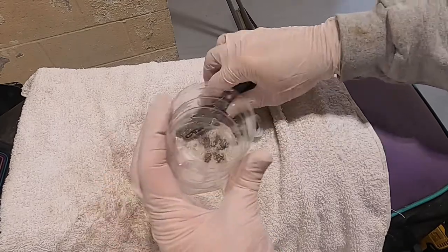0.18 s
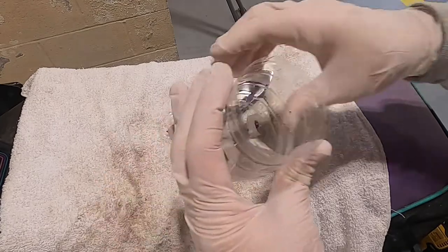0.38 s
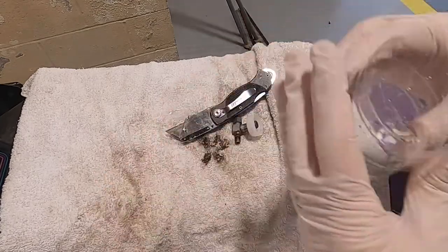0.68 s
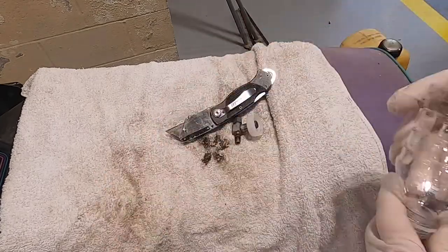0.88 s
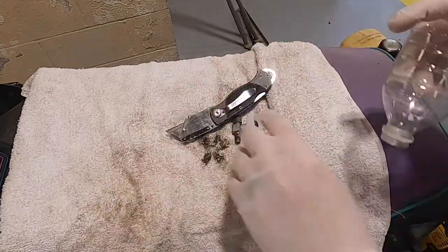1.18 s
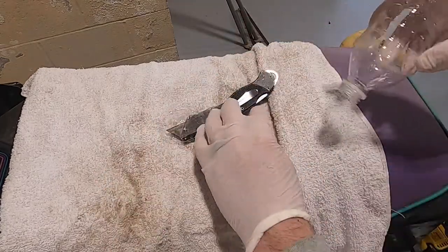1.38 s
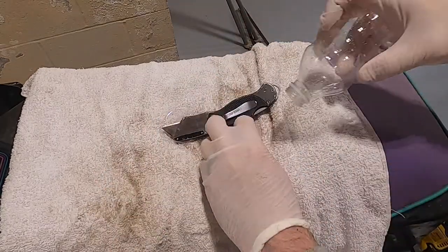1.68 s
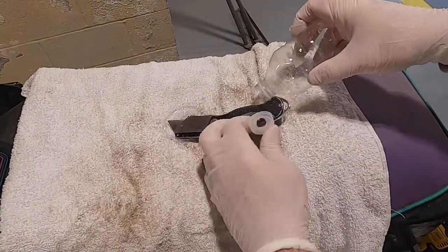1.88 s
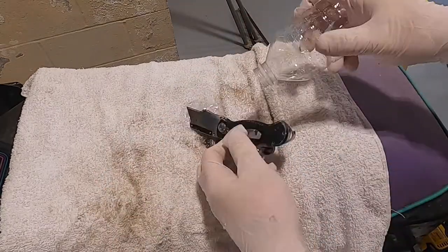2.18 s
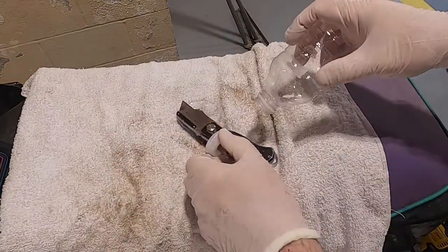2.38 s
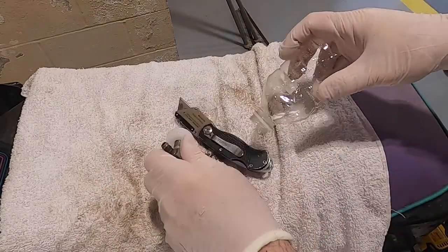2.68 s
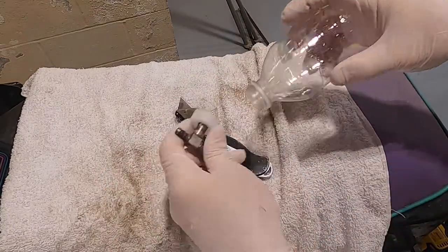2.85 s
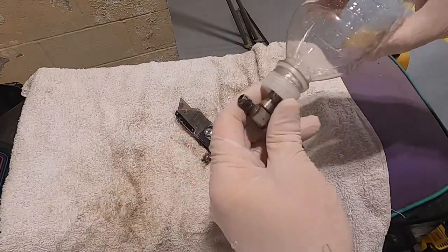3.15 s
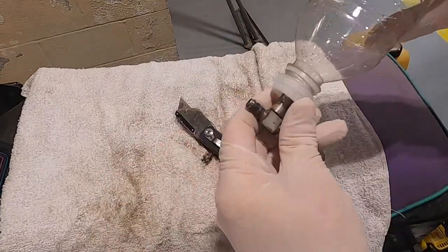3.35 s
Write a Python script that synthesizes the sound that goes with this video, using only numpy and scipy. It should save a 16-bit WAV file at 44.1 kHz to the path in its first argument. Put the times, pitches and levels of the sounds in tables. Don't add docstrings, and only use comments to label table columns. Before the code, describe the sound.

A thin plastic bottle crackles, snaps and rattles in gloved hands, close up in a quiet workshop.

```python
import sys
import numpy as np
from scipy import signal
from scipy.fft import rfft, irfft, next_fast_len
from scipy.io import wavfile
from scipy.ndimage import uniform_filter1d, map_coordinates

SR = 44100
rng = np.random.default_rng(int(sys.argv[2]) if len(sys.argv) > 2 else 0)


def pcm_store(signal):
    levels = np.round(np.clip(np.atleast_2d(signal), -1, 1) * 32767)
    wavfile.write(sys.argv[1], SR, levels.astype(np.int16).T)


def gain_from_db(level_db):
    decades = np.asarray(level_db, float) / 20
    return 10 ** decades


N = 154350


def unit(x):
    return x / np.sqrt(np.mean(x ** 2) + 1e-20)


def along(points, hz):
    f, value = np.transpose(points)
    return np.interp(np.log(hz + 1), np.log(f + 1), value)


def curve(rows):
    s, value = np.transpose(rows)
    return np.interp(np.arange(N) / SR, s, value)


def wobble(rate):
    knots = rng.standard_normal(int(N * rate / SR) + 4)
    return map_coordinates(knots, [np.arange(N) * rate / SR])


def filtered(x, response):
    size = next_fast_len(N + 8192)
    return irfft(rfft(x, size) * response(np.fft.rfftfreq(size, 1 / SR)), size)[..., :N]


def noise(spectrum, lo_hz=0):
    x = filtered(rng.standard_normal(N), lambda hz: gain_from_db(along(spectrum, hz)))
    return x / np.std(filtered(x, lambda hz: hz >= lo_hz))


def bump(f, hz, width_hz):
    return 1 / (1 + ((f - hz) / width_hz) ** 2)


def add(out, s, wave):
    at = np.clip(np.round(s * SR).astype(int), 0, N)[:, None] + np.arange(wave.shape[1])
    out += np.bincount(at.ravel(), wave.ravel(), N + wave.shape[1] + 1)[:N]


def bursts(s, db, t60, size=1200, rise=0.0007):
    t, out = np.arange(size) / SR, np.zeros(N)
    envelope = gain_from_db(db[:, None] - 60 * t / t60) * (1 - np.exp(-t / rise)) ** 2
    add(out, s, envelope * rng.standard_normal((len(s), size)))
    return out


def rings(s, db, hz, t60, size, rise=0.00016):
    t, out = np.arange(size) / SR, np.zeros(N)
    envelope = gain_from_db(db[:, None] - 60 * t / np.reshape(t60, (-1, 1))) * (1 - np.exp(-t / rise))
    add(out, s, envelope * np.sin(2 * np.pi * hz[:, None] * t))
    return out


def patchy(x):
    z = signal.stft(x, nperseg=256)[2]
    field = uniform_filter1d(rng.standard_normal(z.shape), size=4, axis=0)
    field = uniform_filter1d(field, size=7, axis=1)
    return signal.istft(z * gain_from_db(2.8 * unit(field)), nperseg=256)[1][:N]


# (f/Hz, width/Hz, level/dB)
WALL_RIDGES = [(2300, 200, 3), (2870, 83, 5.5), (4300, 210, 1.5), (5920, 237, 8)]


def wall(spectrum):
    def response(f):
        ridges = sum(db * bump(f, hz, width) for hz, width, db in WALL_RIDGES)
        return gain_from_db(along(spectrum, f) + ridges)
    return response


# (t/s, level/dB)
HUM_SWELLS = [(0, -64), (.09, -40), (.2, -49.5), (.3, -35.5), (.37, -69), (.45, -42), (.7, -49),
              (1.4, -54.5), (1.65, -37), (1.74, -56), (1.84, -36.5), (2.07, -51.5), (2.2, -36),
              (2.4, -42.5), (2.8, -36.5), (2.95, -45.5), (3.2, -40), (3.5, -60)]
# (t/s, f/Hz)
HIGH_TONE = [(.35, 66.76), (.55, 73.23)]
# (t/s, f/Hz)
LOW_TONE = [(1.95, 46.4), (2.15, 50.62)]
# (t/s, share of the lower tone)
TONE_SHIFT = [(1.2, 0.14), (1.5, 0.72)]
# (f/Hz, level per Hz/dB)
AIR_COLOUR = [(15, -16.5), (25, 0.5), (73, -10), (169, -18), (378, -36.5), (495, -44.5), (722, -53),
              (10100, -65.5), (15500, -80.5)]


def hum():
    def tone(hz, drift_hz):
        return np.sqrt(2) * np.sin(2 * np.pi * np.cumsum(hz + drift_hz * wobble(4.7)) / SR)

    def duct(f):
        return f ** 2 / (f ** 2 + 60 ** 2) * (1 + 4.5 * bump(f, 980, 150))

    share = np.clip(curve(TONE_SHIFT), 0, 1)
    lower = share * tone(curve(LOW_TONE), 1.4)
    higher = (1 - 1.14 * share) * tone(curve(HIGH_TONE), 1.1)
    fan_hz, fan_db, air_db = 147, -64, -53.5
    fan = gain_from_db(fan_db + 5.6 * wobble(12)) * tone(fan_hz, 3.606)
    air = gain_from_db(air_db + 0.4 * wobble(5.8)) * filtered(noise(AIR_COLOUR, 90), duct)
    return gain_from_db(curve(HUM_SWELLS)) * (lower + higher) + fan + air


# (t/s, level/dB)
HANDLING_LEVEL = [(0, -58), (.2, -62.5), (.37, -53.5), (.57, -61.5), (.75, -61.5), (1.0, -57),
                  (1.37, -61.5), (1.74, -52.5), (2.37, -56.5), (2.6, -59.5), (2.75, -61.5), (3.0, -71.5),
                  (3.42, -71)]
# (f/Hz, level per Hz/dB)
CRACKLE_COLOUR = [(240, -47), (400, -6.5), (600, -12), (950, -1), (2430, -5), (4420, -8.5), (6480, -17),
                  (15500, -39)]


def crackle():
    ticks_per_s, spread_db, clump_db = 250, 8.5, 3.5
    u = rng.random((int(ticks_per_s * N / SR), 2)).T
    ticks = bursts(u[0] * N / SR, -spread_db * np.log(u[1] + 0.06), 0.0045, size=200)
    ticks = unit(filtered(ticks * gain_from_db(clump_db * wobble(17.0)), wall(CRACKLE_COLOUR)))
    hiss = noise(CRACKLE_COLOUR) * gain_from_db(-1.5 + 1.33 * wobble(24.42))
    level_db = curve(HANDLING_LEVEL)
    tick_db = -3 + 0.8 * np.minimum(level_db + 54, 0)
    return gain_from_db(level_db) * (patchy(ticks) * gain_from_db(tick_db) + hiss)


# (start t/s, end t/s, level/dB, low ridge f/Hz, swell/dB)
GLOVE_STROKES = [
    (-0.007, 0.156, -68, 1400, 25),
    (0.776, 0.836, -41.5, 2040, 36),
    (0.868, 0.927, -49.5, 1570, -5.5),
    (0.887, 1.016, -44.5, 1720, 17.5),
    (1.043, 1.202, -67, 1550, -21),
    (1.075, 1.14, -38, 1066, 23),
    (1.278, 1.363, -58.5, 5900, -7.5),
    (2.825, 2.885, -60.5, 8900, 6.5),
    (2.9, 3.018, -69, 6900, 0.5),
    (3.448, 3.526, -48.5, 987, 16.5),
]
# (f/Hz, level per Hz/dB)
RUB_COLOUR = [(450, -17.5), (900, 6.5), (2500, 0.5), (4000, 0), (5500, -7.5), (9500, -14), (14500, -42)]


def strokes():
    t, out = np.arange(N) / SR, np.zeros(N)
    for start, end, db, ridge_hz, swell_db in GLOVE_STROKES:
        def tone(f):
            ridges = 1 + 2.4 * bump(f, ridge_hz, 0.097 * ridge_hz) + 0.27 * bump(f, 3900, 350)
            return gain_from_db(along(RUB_COLOUR, f)) * ridges

        rub = unit(filtered(rng.standard_normal(N) * gain_from_db(2.74 * wobble(160)), tone))
        edge = np.clip((t - start) / 0.012, 0, 1) * np.clip((end - t) / 0.011, 0, 1)
        remaining = np.clip((end - t) / (end - start), 0, 1)
        out += rub * edge * gain_from_db(db - swell_db * remaining ** 2)
    return out


# (start t/s, end t/s, level/dB, first f/Hz, last f/Hz)
PANEL_QUIVERS = [(.185, 0.232, -55.5, 2750, 2900), (.268, 0.308, -38, 2850, 2760),
                 (.325, 0.407, -49.5, 2700, 2800), (.45, 0.916, -67.5, 1000, 1020),
                 (.79, 0.833, -51.5, 3400, 2780), (.88, 0.906, -55.5, 3800, 3530),
                 (.915, 1.022, -50.5, 3770, 3950), (1.03, 1.118, -58, 4300, 4060),
                 (1.1, 1.135, -43, 950, 1180), (1.57, 1.635, -59.5, 4300, 4300),
                 (1.78, 1.888, -67, 6000, 5860), (1.8, 1.883, -62, 2700, 2800),
                 (1.895, 1.968, -45, 890, 911), (1.9, 1.962, -53, 2100, 1510),
                 (1.97, 2.09, -58, 1300, 1866), (2.2, 2.255, -49, 2300, 2136),
                 (2.215, 2.248, -47, 6300, 6280), (2.22, 2.248, -49.5, 4500, 4400),
                 (2.27, 2.306, -51.5, 6200, 5910), (2.35, 2.417, -54, 2900, 2860),
                 (3.45, 3.514, -48, 721, 1055)]


def quivers():
    out = np.zeros(N)
    for start, end, db, first_hz, last_hz in PANEL_QUIVERS:
        at = np.arange(round(start * SR), min(round(end * SR), N))
        t = at / SR - start
        u = t / (end - start)
        knots = rng.standard_normal((3, 600))
        band_rate = 11 * np.sqrt(first_hz)
        re, im = (map_coordinates(k, [t * band_rate]) for k in knots[:2])
        rough = gain_from_db(5.5 * map_coordinates(knots[2], [t * 150]))
        phase = 2 * np.pi * np.cumsum(first_hz + (last_hz - first_hz) * u) / SR
        swell = np.abs(np.sin(np.pi * u)) ** 0.6
        out[at] += gain_from_db(db) * swell * rough * (re * np.cos(phase) + im * np.sin(phase))
    return out


# (f/Hz, level per Hz/dB)
CRACK_COLOUR = [(500, -39.5), (1100, -5), (2200, 0), (3000, 0), (4400, 0), (6200, -14.5), (7500, -18.5),
                (15000, -37.5)]


def snaps(table, treble_db, long):
    s, db, hz = np.transpose(table)
    u = rng.random((len(s), 8)).T
    crack_s, after_s, ring_s = 0.013, 0.011, 0.0084
    crack = bursts(s - 0.0005, 0.92 * db - 5, crack_s * long)
    crack += bursts(s, 1.37 * db + 9.5, 0.0026, rise=0.00013)
    for k in range(3):
        after_db = 0.88 * db - 1.5 - 8 * u[3 + k]
        crack += bursts(s + after_s * long * (u[k] - 0.3), after_db, crack_s)

    def tone(f):
        return wall(CRACK_COLOUR)(f) * gain_from_db(treble_db * np.clip(f / 6000, 0, 1))

    return patchy(filtered(crack, tone)) + rings(s, db, hz, ring_s * (0.81 + 0.36 * u[6]), size=900)


# (t/s, peak level/dB, ring f/Hz)
GRIP_SNAPS = [(0.2241, -4.5, 2890), (0.2344, -24.5, 2880), (0.2613, -11.5, 3770), (0.2836, -15.5, 2900),
              (0.2989, -20.5, 2430), (0.3606, -24.5, 3050), (0.3839, -32, 2870), (0.4186, -28.5, 2520),
              (0.4375, -27.5, 1880), (0.4544, -31.5, 1780), (0.5139, -24, 2560), (0.5356, -33.5, 1710)]
# (t/s, peak level/dB, ring f/Hz)
BUCKLE_SLIPS = [(.2283, -33.5, 3020), (.2648, -13, 3340), (.2705, -17, 2530), (1.7585, -32.5, 2820),
                (1.9, -27, 1340), (1.961, -25.5, 2600), (1.978, -25, 2620), (2.238, -36.5, 2180),
                (2.298, -42.5, 5960), (2.3293, -24.5, 3500), (2.341, -23, 2300), (2.355, -31, 3040)]
# (t/s, peak level/dB, ring f/Hz)
SMALL_CREASES = [(.3125, -32, 2430), (.3352, -37, 2900), (.374, -48, 2880), (.411, -46, 3470),
                 (.6215, -47.5, 2260), (1.5807, -40, 4400), (1.5852, -36, 4230), (1.614, -29.5, 1900),
                 (1.694, -41, 1790), (1.704, -41, 2750), (1.74, -53, 2600), (1.794, -57, 3000),
                 (1.836, -38, 3020), (1.842, -38.5, 4100), (1.872, -36.5, 4590), (1.884, -34.5, 4270),
                 (1.91, -27.5, 3310), (1.966, -33.5, 4370), (2.183, -33, 6200), (2.256, -37.5, 3900),
                 (2.291, -38, 3970), (2.371, -38.5, 2920), (2.434, -32.5, 2500), (2.605, -33.5, 2470),
                 (2.615, -36.5, 2940), (2.642, -30.5, 3020), (2.8, -46, 2580), (2.967, -50, 2980),
                 (3.287, -53.5, 6400), (3.302, -52, 6080), (3.313, -52.5, 5200)]
# (t/s, peak level/dB, ring f/Hz)
TURN_SNAPS = [(1.3931, -34, 1750), (1.4078, -35, 4300), (1.4638, -31.5, 1660), (1.5264, -21, 2580),
              (1.5987, -28.5, 1170), (1.6218, -31.5, 1780), (1.7182, -25, 1640), (1.7543, -17, 2780),
              (1.7875, -27.5, 2670), (1.8272, -32.5, 1740), (1.8956, -6, 1586), (1.9248, -18.5, 1980),
              (1.972, -20.5, 2400), (2.0056, -27.5, 2440), (2.018, -22.5, 2350)]
# (t/s, peak level/dB, ring f/Hz)
RATTLE_SNAPS = [
    (2.0951, -29, 2420),
    (2.1415, -30, 3810),
    (2.175, -28, 2300),
    (2.2039, -25.5, 2470),
    (2.2236, -25, 2240),
    (2.274, -37.5, 4140),
    (2.2844, -39.5, 5940),
]
# (t/s, peak level/dB, ring f/Hz)
SQUEEZE_SNAPS = [(2.3459, -6.5, 2890), (2.4152, -22.5, 2930), (2.4523, -21, 2540), (2.4955, -29, 2260),
                 (2.5045, -27, 2860), (2.518, -23.5, 3000), (2.5919, -20.5, 3720), (2.6314, -36, 3220),
                 (2.6826, -26, 4640), (2.6917, -18.5, 2870), (2.783, -35.5, 5000)]


def wall_cracks():
    cracks = snaps(GRIP_SNAPS, treble_db=-4.5, long=0.92)
    cracks += snaps(BUCKLE_SLIPS, treble_db=3.5, long=0.73)
    cracks += snaps(SMALL_CREASES, treble_db=3.5, long=0.46)
    cracks += snaps(TURN_SNAPS, treble_db=0.093, long=1.0)
    cracks += snaps(RATTLE_SNAPS, treble_db=6.7, long=0.78)
    return cracks + snaps(SQUEEZE_SNAPS, treble_db=-1, long=0.69)


# (t/s, peak level/dB, f/Hz)
BENCH_THUMPS = [(0.266, -22, 155), (0.271, -26.5, 326), (.45, -27.5, 213), (1.62, -28.5, 234),
                (1.72, -30, 293), (1.896, -20.5, 241), (2.352, -29, 252), (2.505, -27, 318),
                (2.693, -14.5, 81), (3.2, -27, 333), (0.637, -37.5, 454), (.89, -36, 500),
                (2.238, -35.5, 326), (2.417, -30, 510), (2.868, -42.5, 480)]


def thumps():
    s, db, hz = np.transpose(BENCH_THUMPS)
    lower = rings(s, db, hz, 7.67 / hz, size=6000, rise=0.0027)
    return lower + rings(s, db - 9, 1.43 * hz, 5 / hz, size=6000, rise=0.0012)


# (t/s, peak level/dB, click over the ring/dB)
NECK_TAPS = [
    (1.895, -20.5, -4.5),
    (3.106, -42, -3.5),
    (3.117, -25.5, -19),
    (3.201, -31.5, 0),
    (3.206, -24, -27),
    (3.236, -26.5, -11),
    (3.229, -36.5, -7),
    (3.285, -40, -16),
    (3.303, -41, -14),
    (3.344, -42.5, -14),
]
# (f/Hz, width/Hz, level/dB)
NECK_MODES = [(856, 94, 7.5), (933, 84, -1)]


def taps():
    s, db, click_db = np.transpose(NECK_TAPS)

    def hollow(f):
        modes = sum(gain_from_db(g) * 1j * f * w / (hz * hz - f * f + 1j * f * w) for hz, w, g in NECK_MODES)
        return modes / (1 + (f / 1500) ** 2)

    push = bursts(s - 0.001, db + 22.5, 0.017, rise=0.0017)
    click = bursts(s - 0.002, db + np.minimum(click_db, 0) + 17.0, 0.017, rise=0.0024)
    return filtered(push, hollow) + filtered(click, lambda f: gain_from_db(along(RUB_COLOUR, f)))


def room(x):
    hz, t, z = signal.stft(rng.standard_normal(SR // 3), SR, nperseg=256)
    t60 = 0.17 * (2000 / (hz[:, None] + 1000)) ** 0.36
    tail = signal.istft(z * gain_from_db(-60 * t / t60), SR, nperseg=256)[1]
    return signal.fftconvolve(np.pad(x, (200, 0)), tail / np.linalg.norm(tail))[:N]


def scene():
    bottle = crackle() + strokes() + quivers() + wall_cracks() + taps()
    room_db, side_db = -15.5, -27
    mid = hum() + bottle + gain_from_db(room_db) * room(bottle) + thumps()
    side = filtered(np.roll(mid, 30), lambda f: (f / 4000) ** 0.8 + 22 * (f > 11500))
    side *= gain_from_db(side_db)
    return np.array([mid + side, mid - side])


def band_limit(x):
    return signal.sosfilt(signal.butter(12, 15750, fs=SR, output="sos"), x)


def record(dry):
    mix = filtered(dry, lambda hz: (hz < 15750) / (1 + (hz / 14500) ** 20))
    return band_limit(mix)


dry = scene()
out = record(dry)
pcm_store(out)
```